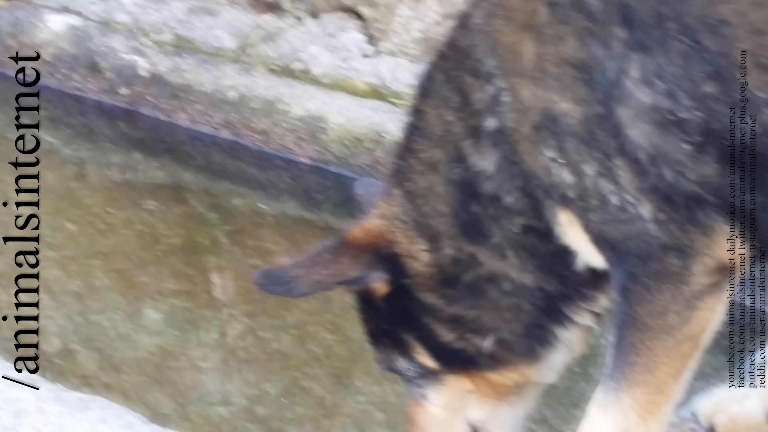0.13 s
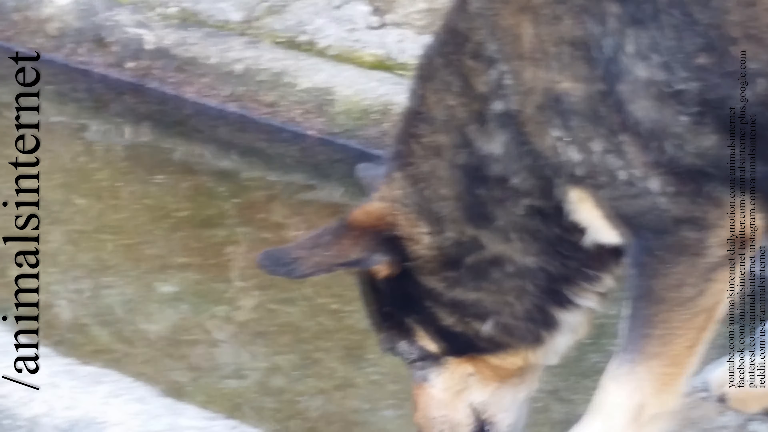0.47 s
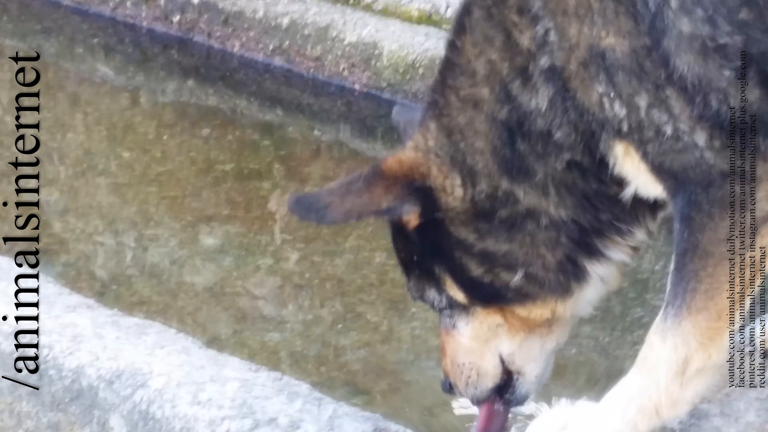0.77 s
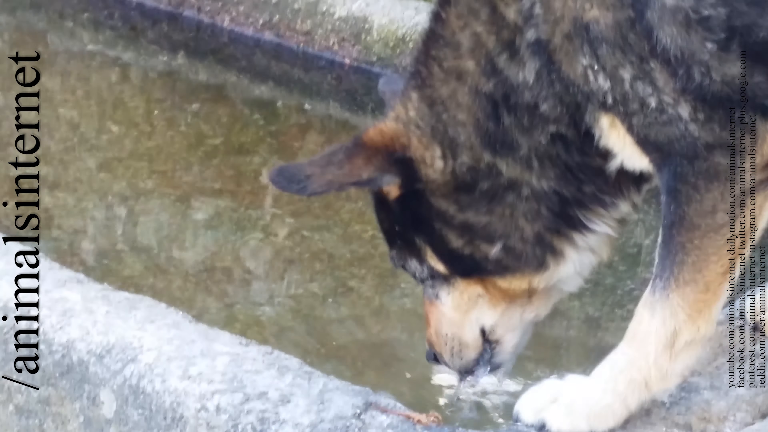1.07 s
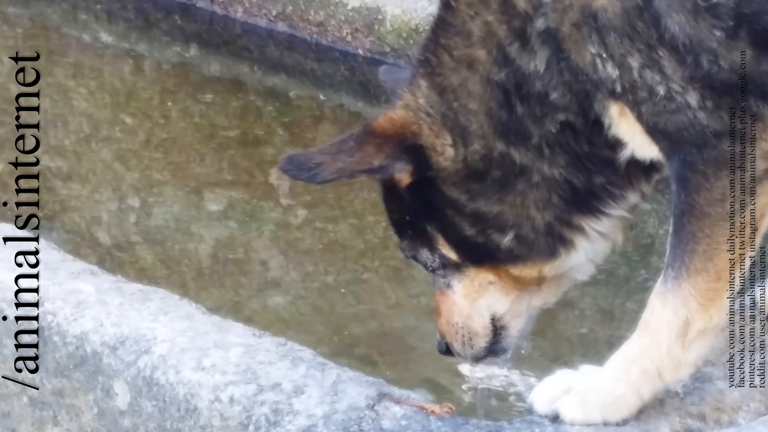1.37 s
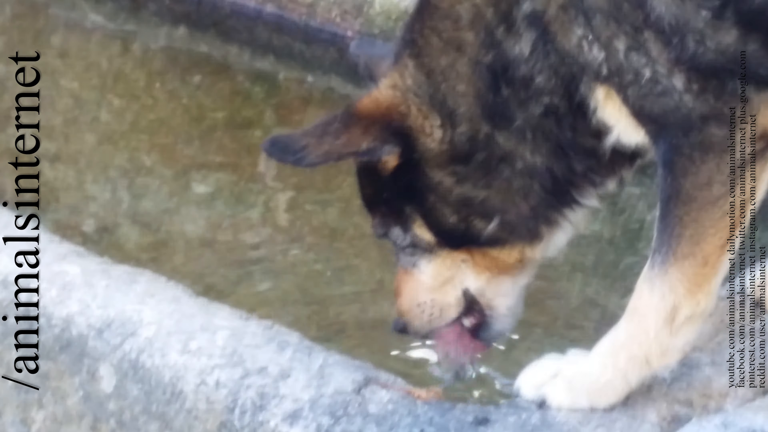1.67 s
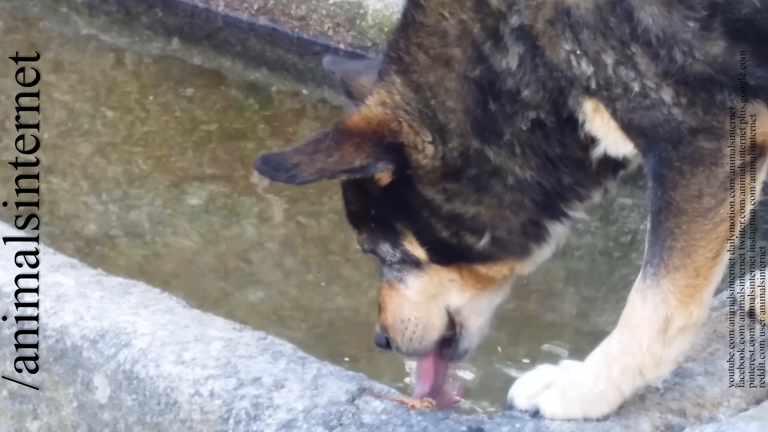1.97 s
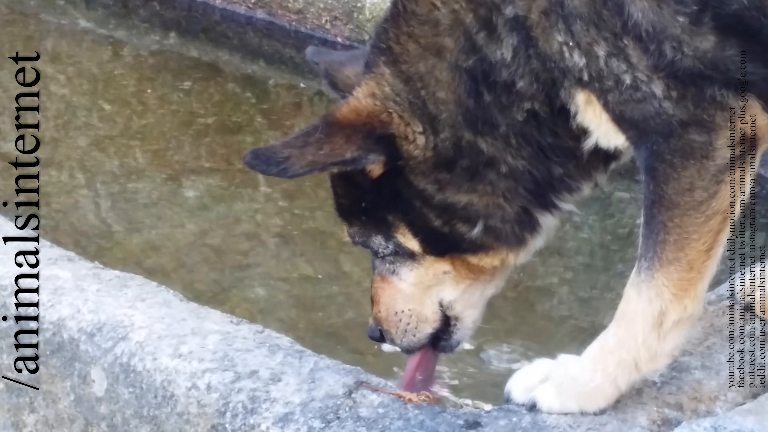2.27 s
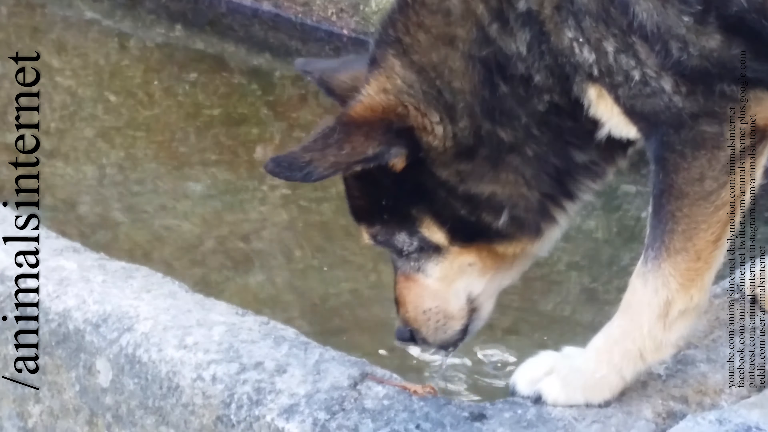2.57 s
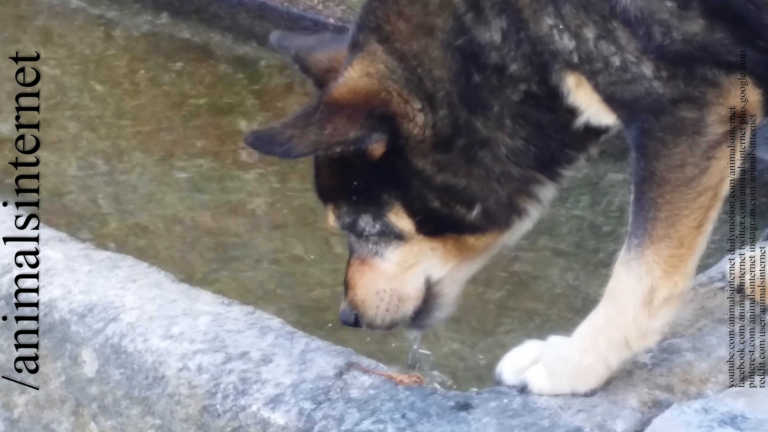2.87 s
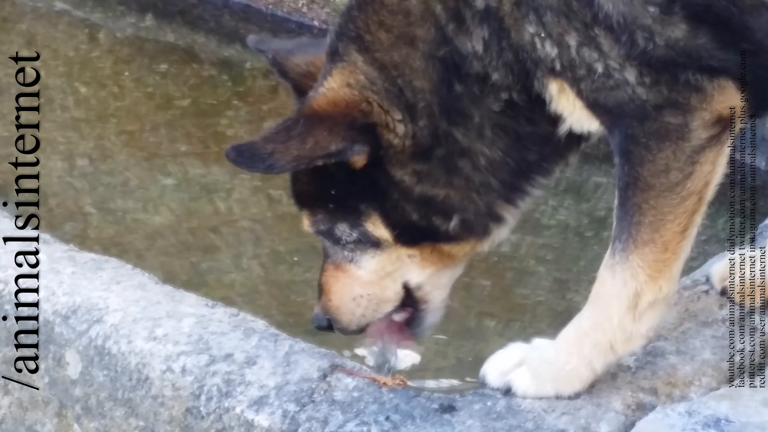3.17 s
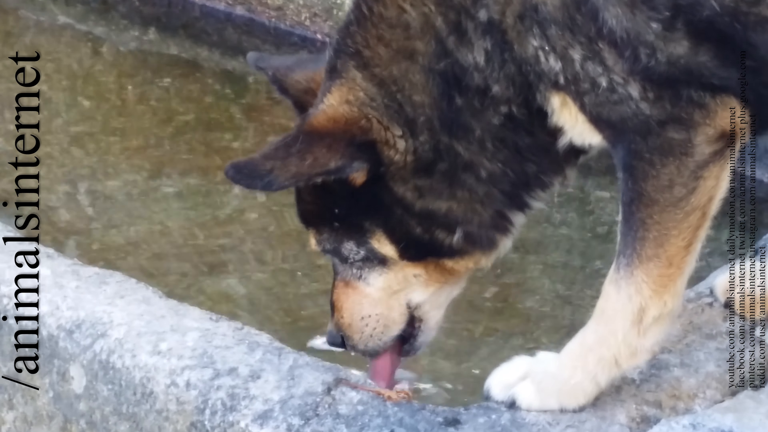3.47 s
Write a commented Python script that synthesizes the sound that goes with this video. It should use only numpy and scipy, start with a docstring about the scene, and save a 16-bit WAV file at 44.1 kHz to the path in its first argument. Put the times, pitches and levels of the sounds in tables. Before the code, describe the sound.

Close wet lapping by a dog at a stone basin, with an idling engine droning behind

```python
"""Outdoors, a wash of shaped noise, a steady machine hum of wavering tones and an idling engine run from the start.
The engine is built from multiples of its shaft rate; its level sinks now and then. A fine fizz of bubbles runs along.
From about 0.2 s on, a dog laps from a stone basin, close to three laps a second.
Each lap stirs a spray of tiny bubbles; larger ones plop with falling loudness and rising pitch, and some laps click.
Right after each water sound, the stone throws it back as short, dense echoes."""
import sys
import numpy as np
from scipy import signal
from scipy.fft import rfft, irfft
from scipy.io import wavfile
from scipy.ndimage import uniform_filter1d

SR = 44100
rng = np.random.default_rng(int(sys.argv[2]) if len(sys.argv) > 2 else 0)


def transcribe(u):
    """Save the signal u as a 16-bit wav file named by the first command-line argument.

    u: samples, shape (n,) or (channels, n), limited to [-1, 1]; the rate is SR.
    q: integer samples, one column per channel.
    """
    v = np.clip(np.atleast_2d(u).T, -1, 1)
    q = np.round(v * 32767).astype(np.int16)
    wavfile.write(sys.argv[1], SR, q)


N = 159201  # length in samples
EDGE_HZ = 14800  # upper edge of the sound


def amp(db):
    """Turns decibels into a gain."""
    return 10 ** (np.asarray(db) / 20)


def unit(x):
    """Scales a sound to an rms of 1."""
    return x / np.sqrt(np.mean(x ** 2) + 1e-20)


def read(points, hz):
    """Reads a spectrum table between its points, on a log-frequency axis."""
    f, value = np.transpose(points)
    return np.interp(np.log(hz + 1), np.log(f + 1), value)


def level(points):
    """Turns a table of times and decibels into a gain for every sample."""
    return amp(np.interp(np.arange(N) / SR, *np.transpose(points)))


def add(mix, s, sound):
    """Mixes a sound in, starting at time s in seconds."""
    part = mix[max(round(s * SR), 0):][:len(sound)]
    part += sound[:len(part)]


def drift(rate_hz):
    """A slow random wander around zero: noise that keeps only its slowest changes."""
    f = np.fft.rfftfreq(1024, N / SR / 900)
    keep = np.exp(-(f / rate_hz) ** 2) * (f > 0)
    slow = unit(irfft(rfft(rng.standard_normal(1024)) * keep))
    # 900 of the 1024 points span the whole scene
    return np.interp(np.linspace(0, 900, N), np.arange(len(slow)), slow)


def onset(t, rise_s):
    """A smooth start from silence."""
    return 1 - np.exp(-(t / rise_s) ** 2)


# Colour of the outdoor wash: f/Hz, relative level per Hz/dB
AIR_COLOUR = [(40, -30), (90, 4), (200, 7), (260, 4.5), (330, 1.5), (450, 2), (560, -0.5), (750, -5.5),
              (1000, -3.5), (1280, -13.5), (1650, -6.5), (2000, -13), (2600, -23), (3400, -21.5),
              (4500, -23), (5600, -25.5), (7000, -30), (10500, -31), (13000, -31), (14800, -36)]
# Loudness of the wash over time, before its swells: t/s, level/dB
AIR_LEVEL = [(0, -47), (.6, -45.5), (1.2, -48), (1.9, -44.5), (2.4, -44.5), (2.7, -46), (3.1, -46),
             (3.6, -43.5)]
PATCH_DB, SWELL_DB = 3.5, 0.83  # typical unevenness in time and pitch; typical swell of the whole wash


def air():
    """Outdoor wash: noise coloured by the table, with small drifting louder and softer patches."""
    hz = np.fft.rfftfreq(1024, 1 / SR)
    a, b, patches = rng.standard_normal((3, N // 256 + 5, len(hz)))
    # smooth over time, then over frequency
    patches = uniform_filter1d(patches, size=8, axis=0)
    patches = unit(uniform_filter1d(patches, size=5, axis=1))
    spectrum = (a + 1j * b) * amp(read(AIR_COLOUR, hz) + PATCH_DB * patches)
    wash = signal.istft(spectrum.T, nperseg=1024, noverlap=768)[1][:N]
    low_cut = signal.butter(4, 90, "highpass", fs=SR, output="sos")
    wash = signal.sosfilt(low_cut, wash)
    return unit(wash) * level(AIR_LEVEL) * amp(SWELL_DB * drift(4.7))


# Tones of the machine hum: f/Hz, rms level before wavering/dB
HUM_TONES = [(118.2, -46.5), (236.3, -68), (388.8, -61), (472.3, -60), (596, -61.5), (642, -65), (882, -71),
             (1603, -67), (5541, -79)]
HUM_WAVER_DB, HUM_WANDER = 0.5, 0.0016  # typical wander of level, and of pitch as a share


def hum():
    """Machine hum: steady sine tones whose level and pitch each waver a little."""
    t = np.arange(N) / SR
    out = np.zeros(N)
    for hz, db in HUM_TONES:
        # above 900 Hz the pitch wander in Hz grows no further
        wander_turns = min(hz, 900) * HUM_WANDER * np.cumsum(drift(3.7)) / SR
        tone = np.sin(2 * np.pi * (hz * t + wander_turns + rng.random()))
        out += np.sqrt(2) * amp(db + HUM_WAVER_DB * drift(2.2)) * tone
    return out


# Low engine tones: multiple of the shaft rate, relative level/dB
ENGINE_ORDERS = [(3, -9.5), (4.5, -9), (5, -12), (6, -1.5), (7, -6), (7.5, -9), (8, -11), (9, 0.5),
                 (9.5, -11), (10, -0.5), (10.5, -5.5), (11, -27), (11.5, -41), (12, 2), (12.5, -9),
                 (13, -5), (13.5, 0), (14, -1), (14.5, -8), (15, 5), (15.5, -6.5), (16, -7.5), (17, -15)]
# Loudness of the low tones over time, before ENGINE_DB is added: t/s, level/dB
ENGINE_LEVEL = [(0, -45), (.25, -45), (.62, -45.5), (.66, -49.5), (1.0, -49), (1.4, -47), (1.7, -45),
                (2.1, -44.5), (2.35, -50.5), (2.6, -46), (2.9, -44), (3.3, -45), (3.6, -49.5)]
# Colour of the higher engine tones: f/Hz, relative level/dB
CLATTER_COLOUR = [(240, -81), (270, -23), (330, 5.5), (365, -16), (395, -1), (460, 0.5), (520, -18.5),
                  (590, -7.5), (740, -9), (900, -24), (1300, -66)]
SHAFT_HZ, WANDER = 15.19, 0.0014  # average turns per second, and their typical wander as a share
ORDER_WAVER_DB = 1.5  # typical wander of each low tone
ENGINE_DB, CLATTER_DB = 2, -54  # lift of the low tones; rms level of the clatter


def engine():
    """Idling engine: wavering multiples of the shaft rate and a faint clatter that repeats every two turns."""
    turns = np.cumsum(SHAFT_HZ * (1 + WANDER * drift(1.15))) / SR
    low = np.zeros(N)
    for multiple, db in ENGINE_ORDERS:
        tone = np.sin(2 * np.pi * (multiple * turns + rng.random()))
        low += amp(db + ORDER_WAVER_DB * drift(0.68)) * tone
    # the clatter uses multiples of half the shaft rate, all above the low tones
    k = np.arange(170)
    strength = amp(read(CLATTER_COLOUR, k * SHAFT_HZ / 2)) * (k > 2 * ENGINE_ORDERS[-1][0])
    cycle = irfft(strength * np.exp(2j * np.pi * rng.random(len(k))), 8192)
    clatter = np.interp(turns / 2 % 1, np.arange(len(cycle)) / len(cycle), cycle)
    return amp(ENGINE_DB) * level(ENGINE_LEVEL) * unit(low) + amp(CLATTER_DB) * unit(clatter)


# echo level against the direct sound, time to fade by 60 dB, wait before the first echo
BASIN_DB, BASIN_T60_S, BASIN_DELAY_S = -12, 0.18, .004


def basin(x):
    """Stone walls: adds short, dense echoes at random delays, fading quickly."""
    t = np.arange(SR // 3) / SR
    # about 2000 echoes a second
    echoes = rng.standard_normal(len(t)) * (rng.random(len(t)) < 2000 / SR)
    echoes *= (t > BASIN_DELAY_S) * np.exp(-np.log(1000) * t / BASIN_T60_S)
    return x + amp(BASIN_DB) * signal.fftconvolve(x, echoes / np.linalg.norm(echoes))[:N]


def bubble(hz, t60, glide, rise_s):
    """A trapped bubble rings, fading by 60 dB in t60 seconds while its pitch climbs by twice the glide."""
    t = np.arange(0, max(t60, .003), 1 / SR)
    fade = onset(t, rise_s) * np.exp(-np.log(1000) * t / t60)
    return fade * np.sin(2 * np.pi * hz * t * (1 + glide * t / t60))


# tiny bubbles: longest 60 dB fade, glide as a share, rise time
SPRAY_T60_S, SPRAY_GLIDE, SPRAY_RISE_S = .02, .04, .0014
# fizz: rms level, middle pitch, reach to either side
TRICKLE_DB, TRICKLE_HZ, TRICKLE_OCTAVES = -66, 3416, 0.628


def trickle(count=3500, size_db=4.0):
    """Fizz on the disturbed water: tiny bubbles at random times all through, of scattered pitch and strength."""
    out = np.zeros(N)
    for when, tune, chance in rng.random((count, 3)):
        hz = TRICKLE_HZ * 2 ** (TRICKLE_OCTAVES * (2 * tune - 1))
        size = amp(size_db * min(-np.log(chance), 3))
        add(out, when * N / SR, size * bubble(hz, SPRAY_T60_S, SPRAY_GLIDE, SPRAY_RISE_S))
    return amp(TRICKLE_DB) * unit(out)


# Water stirred by tongue and jaws: centre t/s, quarter of the span in which bubbles start/s,
# level/dB, middle f/Hz, pitch spread (rms)/octaves
SPLASHES = [(0.198, 0.012, -57, 1940, 0.49), (0.404, 0.017, -56, 3620, 0.18),
            (0.416, 0.034, -54.5, 1290, 0.56), (.457, .012, -52, 1486, 0.31),
            (0.662, 0.045, -55, 3200, 0.49), (0.666, 0.0062, -63, 11400, 0.19),
            (1.024, 0.019, -55, 1916, 0.56), (1.095, 0.018, -53, 1690, 0.55),
            (1.345, 0.0063, -50.5, 2830, 0.32), (1.407, 0.013, -57, 1870, 0.35),
            (1.448, 0.028, -52.5, 1470, 0.39), (1.819, 0.024, -57, 3680, 0.17),
            (1.897, 0.04, -56.5, 2300, 0.94), (2.154, 0.0057, -41.5, 1793, 0.43),
            (2.152, 0.0082, -61, 13400, 0.063), (2.196, 0.012, -48.5, 1720, 0.52),
            (2.243, 0.0052, -42.5, 3060, 0.28), (2.247, .008, -57, 1100, 0.42),
            (2.277, 0.029, -55, 2345, 0.5), (2.512, 0.017, -50.5, 1870, 0.53),
            (2.52, 0.017, -58.5, 4130, .25), (2.524, 0.0064, -61, 9300, 0.096),
            (2.596, 0.02, -53.5, 1640, 0.62), (2.70, 0.024, -45.5, 496, 0.15),
            (2.941, 0.011, -49, 3064, 0.59), (2.958, 0.015, -64, 13000, 0.16),
            (2.99, 0.011, -57.5, 3810, 0.5), (3.306, 0.015, -54.5, 2155, 0.72),
            (3.349, 0.034, -54, 1764, 0.48), (3.401, .014, -46, 1445, 0.455),
            (3.428, 0.014, -57, 4450, 0.13), (3.487, 0.027, -60, 4710, 0.089)]
SPRAY_PER_S = 3500  # bubbles per second, counted over half the span


def splashes(size_db=1.5):
    """Each stir of the water is a cloud of tiny bubbles of scattered pitch and strength, densest mid-way."""
    out = np.zeros(N)
    for s, quarter, db, pitch, spread in SPLASHES:
        half_span = 2 * quarter
        cloud = np.zeros(SR // 2)
        draws = rng.random((500, 4))
        t60 = min(SPRAY_T60_S, half_span)
        count = max(int(half_span * SPRAY_PER_S), 3)
        for early, late, tune, chance in draws[:count]:
            hz = min(pitch * 2 ** (spread * np.sqrt(3) * (2 * tune - 1)), EDGE_HZ)
            size = amp(size_db * min(-np.log(chance), 3))
            # two random waits added together favour the middle
            add(cloud, half_span * (early + late), size * bubble(hz, t60, SPRAY_GLIDE, SPRAY_RISE_S))
        # same energy as an rms of 1 held for half the span
        cloud *= np.sqrt(half_span * SR / np.sum(cloud ** 2))
        add(out, s - half_span, amp(db) * cloud)
    return out


# The wet tongue parting from water or palate: t/s, starting level/dB
CLICKS = [(0.6658, -49), (2.1495, -41.5), (2.9321, -44), (2.949, -49), (3.2992, -48), (3.408, -49)]
CLICK_HZ, CLICK_OCTAVES, CLICK_DECAY_S = 2920, 0.57, 0.0024  # middle, width, decay time constant


def clicks():
    """A film of water tears: a few milliseconds of wide noise."""
    out = np.zeros(N)
    noise = rng.standard_normal((len(CLICKS), 1024))
    t, f = np.arange(noise.shape[1]) / SR, np.fft.rfftfreq(noise.shape[1], 1 / SR)
    octaves = np.log2((f + 1) / CLICK_HZ)
    colour = 1 / (1 + (octaves / CLICK_OCTAVES) ** 2)
    for (s, db), raw in zip(CLICKS, noise):
        tear = unit(irfft(rfft(raw) * colour))
        add(out, s, amp(db) * np.exp(-t / CLICK_DECAY_S) * tear)
    return out


# Larger bubbles and drops: t/s, starting f/Hz, level before POP_DB or SNAP_DB is added/dB,
# time for the ring to fade by 60 dB (t60)/s
POPS = [(0.1936, 1420, -32, 0.028), (.1915, 2640, -41.5, 0.032), (.436, 4500, -41.5, 0.03),
        (.445, 1260, -30, 0.059), (.4455, 1540, -37.5, .022), (.667, 2370, -39, .016),
        (.6708, 4700, -40, .017), (.6788, 3630, -40.5, .035), (.7668, 4450, -47.5, .025),
        (1.009, 4460, -45, 0.022), (1.0204, 3630, -36.5, 0.018), (1.087, 1170, -36.5, 0.03),
        (1.0993, 2930, -45, 0.029), (1.1072, 900, -34, 0.013), (1.336, 3000, -45, .045),
        (1.347, 2350, -36, 0.036), (1.349, 2860, -40, 0.031), (1.388, 3700, -48, 0.026),
        (1.396, 830, -38, .035), (1.4256, 1680, -35.5, 0.021), (1.4512, 885, -31, .022),
        (1.461, 5440, -47, 0.018), (1.463, 980, -33, .022), (1.469, 2200, -38.5, 0.042),
        (1.7962, 3300, -37.5, 0.024), (1.91, 1000, -35.5, 0.03), (1.9152, 2520, -41, 0.034),
        (2.1474, 2430, -31.5, 0.044), (2.1505, 1400, -22, 0.0057), (2.1493, 5930, -36.5, 0.014),
        (2.1513, 1660, -18.5, 0.017), (2.1568, 1600, -39, 0.016), (2.184, 844, -29, 0.013),
        (2.1894, 2390, -40.5, .04), (2.2349, 1055, -16, .0145), (2.2348, 3850, -24, .0105),
        (2.2348, 2850, -30.5, .024), (2.235, 2000, -31.5, .008), (2.2521, 4250, -36, .01),
        (2.5, 3300, -31, 0.014), (2.506, 1025, -32, 0.024), (2.511, 3580, -42, 0.02),
        (2.528, 2650, -46, 0.018), (2.532, 3430, -43, .022), (2.581, 1240, -34, 0.014),
        (2.5888, 1010, -34, 0.061), (2.591, 2240, -38, .04), (2.931, 5020, -32, 0.015),
        (2.931, 1010, -39, 0.021), (2.949, 12680, -35, 0.0067), (3.0345, 850, -33.5, 0.023),
        (3.299, 1616, -27.5, 0.028), (3.3023, 2175, -27.5, 0.032), (3.3457, 1070, -32.5, 0.016),
        (3.348, 2400, -39, .023), (3.3943, 976, -24.5, 0.016), (3.408, 4570, -34.5, 0.013),
        (3.416, 4530, -36.5, 0.016)]
POP_DB, POP_RISE_SHARE = -4.5, 0.041  # trim of the ring's peak; rise time as a share of t60
POP_GLIDE = .06  # glide share, scaled at random for each bubble
# the film tearing as a bubble forms: trim in dB, time constant as a share of t60, width in octaves
SNAP_DB, SNAP_SHARE, SNAP_WIDTH = -12, .21, .21


def pops():
    """Larger bubbles: a short wet snap of noise together with a ring that climbs by its own amount."""
    out = np.zeros(N)
    noise = rng.standard_normal((len(POPS), 2048))
    t, f = np.arange(noise.shape[1]) / SR, np.fft.rfftfreq(noise.shape[1], 1 / SR)
    for (s, hz, db, t60), raw in zip(POPS, noise):
        rise_s = POP_RISE_SHARE * t60
        octaves = np.log2((f + 1) / hz)
        snap = unit(irfft(rfft(raw) / (1 + (octaves / SNAP_WIDTH) ** 4)))
        snap *= np.exp(-t / (SNAP_SHARE * t60)) * onset(t, rise_s)
        add(out, s, amp(db + SNAP_DB) * snap)
        # the last noise value doubles as this bubble's random glide
        ring = bubble(hz, t60, POP_GLIDE * abs(raw[-1]), rise_s)
        add(out, s, amp(db + POP_DB) * ring / abs(ring).max())
    return out


def scene():
    """The lapping, with its stone echoes, in front of engine, hum and wash."""
    water = clicks() + pops() + splashes() + trickle()
    return (basin(water) + engine() + hum() + air())[None]


def record(dry):
    """The recorder's band limit: a steep filter takes away what lies above EDGE_HZ."""
    low_pass = signal.firwin(511, EDGE_HZ, window=("kaiser", 9), fs=SR)
    return signal.oaconvolve(dry, low_pass[None], "same")


dry = scene()
out = record(dry)
transcribe(out)
```